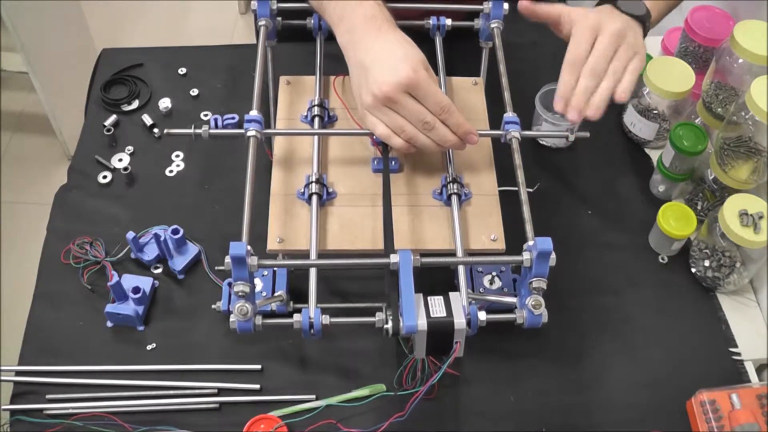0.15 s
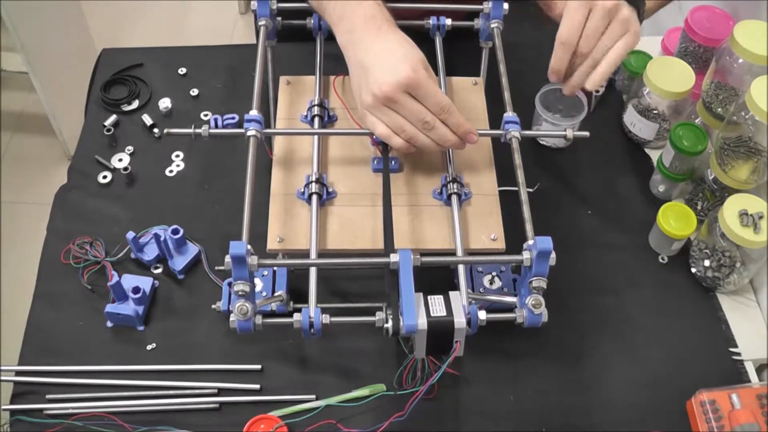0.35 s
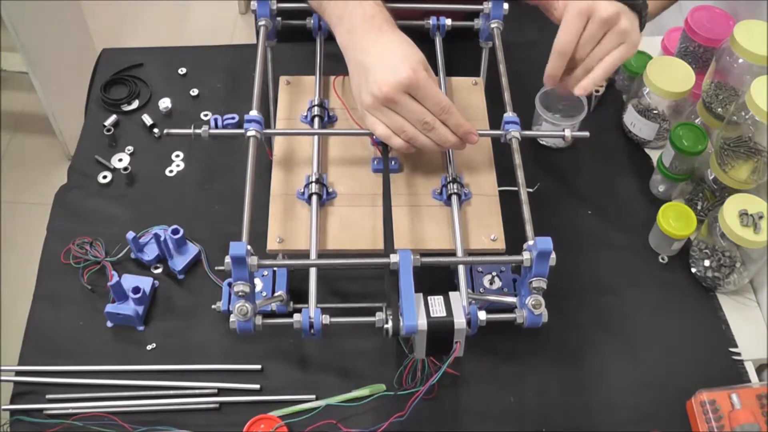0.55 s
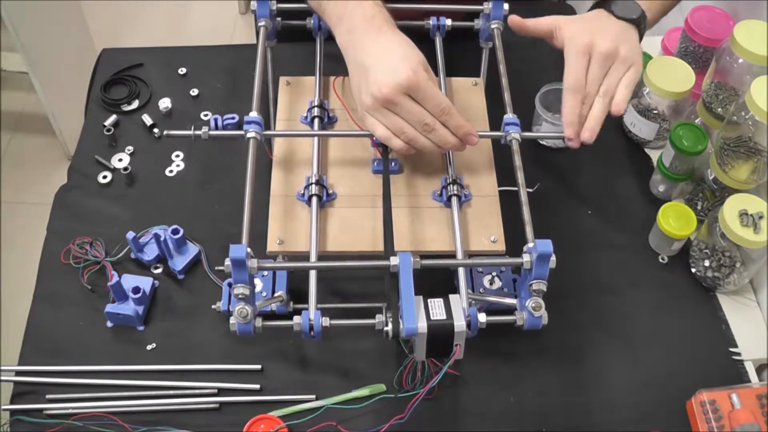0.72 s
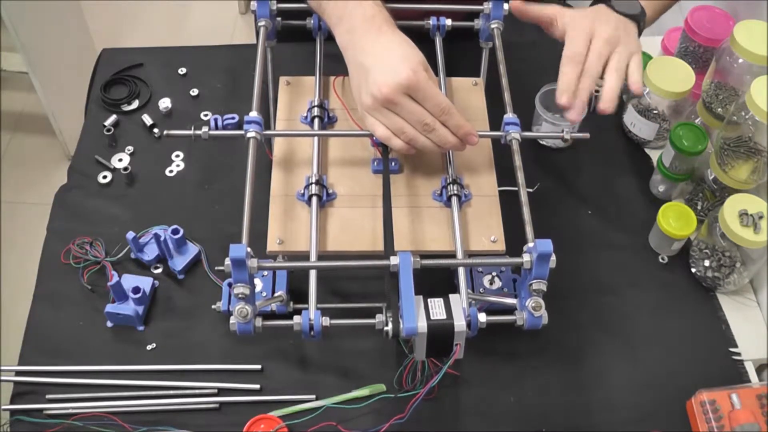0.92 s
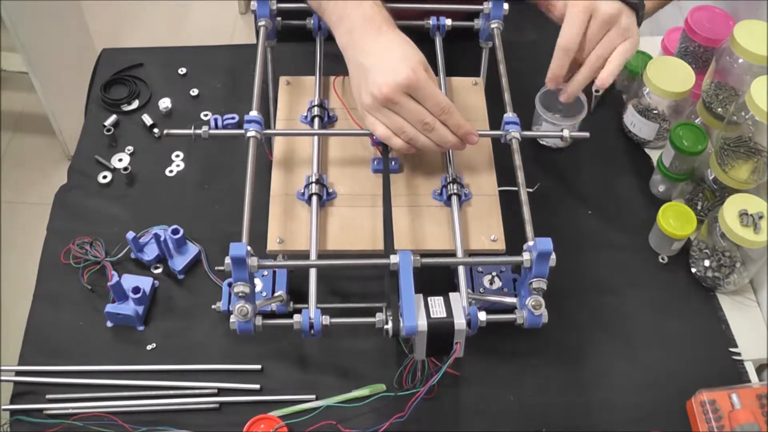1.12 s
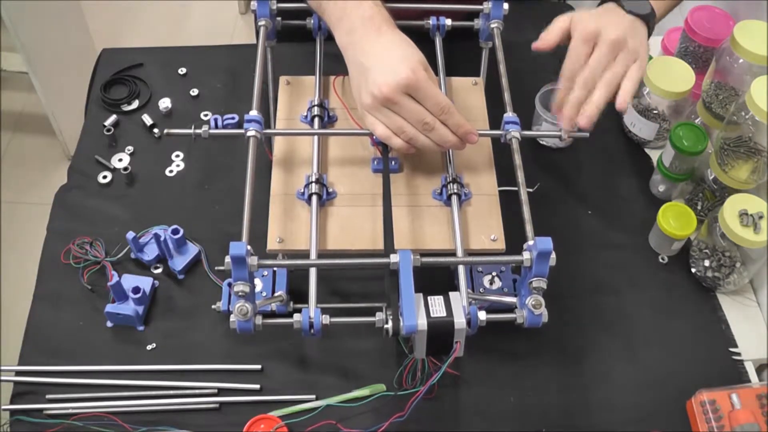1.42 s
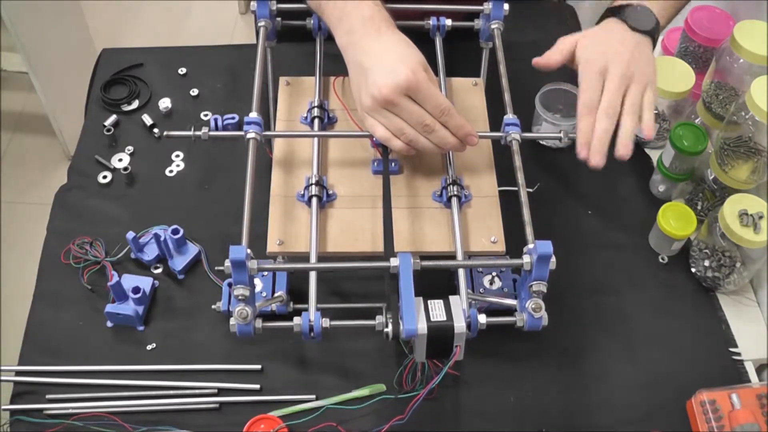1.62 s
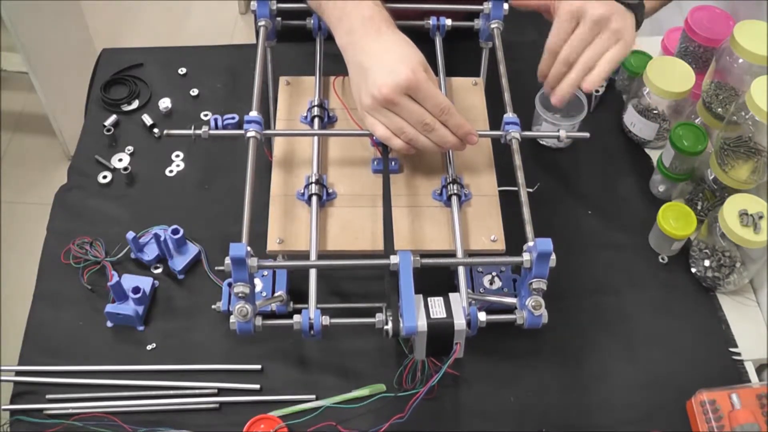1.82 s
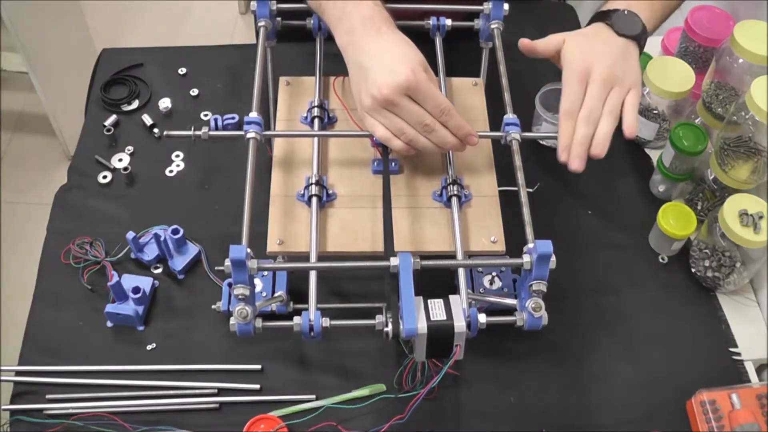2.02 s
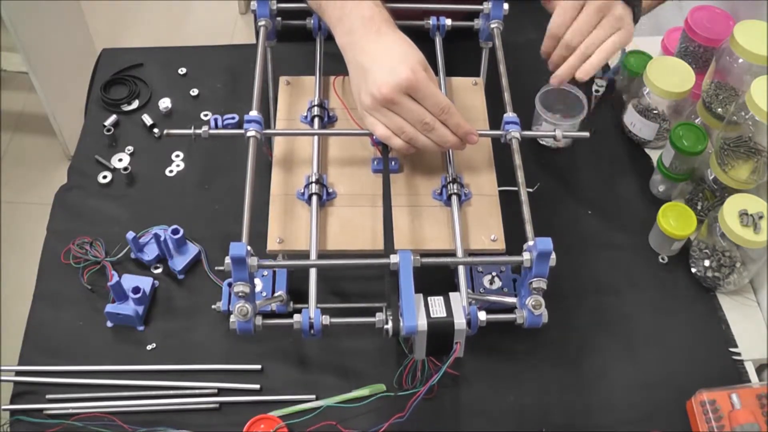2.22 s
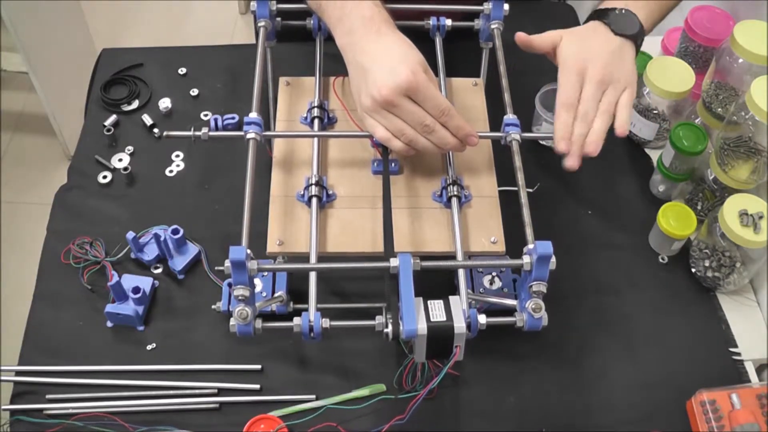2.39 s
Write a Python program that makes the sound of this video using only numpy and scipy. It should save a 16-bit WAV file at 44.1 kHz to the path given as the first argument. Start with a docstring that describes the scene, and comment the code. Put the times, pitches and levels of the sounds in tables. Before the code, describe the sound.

Metal nut spinning on a threaded rod in uneven flicks, clicking, scraping and rattling a light frame

```python
"""A low room rumble lies underneath, and the sound opens just after a flick, in its scrape and ringing.
Fingers give a steel nut on a threaded rod five firm flicks; between them it whirrs along the thread.
Three light flicks follow, each with a short whirr. The rod sits in a frame on a table in a small live room.
Scrapes and whirr are gritty noise that rings the rod; pushes thud and ring the frame; loose parts rattle
as noise bursts. Reflections from table, frame and room surround it all."""
import sys
import numpy as np
from scipy import signal
from scipy.fft import rfft, irfft
from scipy.io import wavfile
from scipy.ndimage import uniform_filter1d

SR = 44100
rng = np.random.default_rng(int(sys.argv[2]) if len(sys.argv) > 2 else 0)


def materialize(psi):
    """Save the field psi as 16-bit PCM at rate SR to the path in sys.argv[1].

    A 1-D psi becomes a single channel; in a 2-D psi each row is a channel.
    """
    bounded = np.clip(np.atleast_2d(psi).T, -1, 1)
    quanta = np.round(bounded * 32767).astype(np.int16)
    wavfile.write(sys.argv[1], SR, quanta)


N = 112454

# steady room rumble, its colour: (frequency [Hz], relative level [dB])
RUMBLE_COLOUR = [(15, -59), (25, -15), (56, 1.5), (123, -2), (249, -10), (309, -8.5), (427, -12.5),
                 (489, -4.5), (531, -16.5), (818, -20.5), (1260, -29), (1400, -31), (2050, -37.5),
                 (3820, -43.5), (5430, -41), (5880, -42.5), (16000, -51)]
# how long the room rings in each band: (frequency [Hz], time to fall by 60 dB [s])
ROOM_DECAY = [(100, 0.45), (260, 0.46), (700, 0.43), (1800, 0.22), (5000, 0.55), (9000, 0.39),
              (14000, 0.24)]
# how far the room sound spreads to the sides: (frequency [Hz], side level [dB])
ROOM_WIDTH = [(60, -19), (200, -13), (600, -10.5), (1200, -6), (2500, -8.5), (3900, -33), (5400, -15.5),
              (6500, -32.5), (7500, -44), (8500, -21), (9700, -15), (11000, -6), (14500, -0.5)]
# the same for the first reflections from table and frame: (frequency [Hz], side level [dB])
NEAR_WIDTH = [(200, -20), (1000, -8), (2500, -29.5), (3700, -35.5), (5400, -16.5), (6500, -25),
              (9000, -20.5), (11000, -5.5), (14500, -7)]
# loose parts rattling after a knock: (start [s], relative level [dB], decay [s])
RATTLES = [(-.03, -31, 0.027), (0.112, -28.5, 0.026), (0.185, -38, 0.045), (.349, -34, 0.057),
           (.620, -29, .018), (0.665, -23.5, 0.018), (0.689, -31, 0.023), (0.862, -39, 0.039),
           (0.916, -25.5, 0.014), (1.129, -26.5, 0.019), (1.195, -37.5, 0.032), (1.595, -38.5, .025)]
# colour of the rattle: (frequency [Hz], relative level [dB])
RATTLE_COLOUR = [(150, 0.5), (400, 9.5), (850, -0.5), (1150, -5), (1380, -8), (1540, -5.5), (1750, -12.5),
                 (2000, -19), (2600, -22), (4500, -16.5), (9000, -26.5)]
# pushes on the frame: (start [s], relative level [dB], centre of the push [Hz], length of the push [cycles])
KNOCKS = [(-.06, -17.5, 324, 0.36), (.097, -18.5, 185, 0.33), (0.182, -20, 245, 1.04),
          (0.349, -23.5, 200, 0.41), (.41, -33, 91, 1.35), (.605, -21, 196, 0.45), (.665, -17.5, 400, 0.97),
          (0.858, -21, 206, 0.33), (.911, -18, 293, 0.79), (1.115, -25, 178, 0.52), (1.137, -42, 72.5, 1.9),
          (1.197, -22.5, 199, 0.35), (1.289, -44.5, 175, 0.48), (1.597, -28.5, 253, 0.49),
          (1.923, -37.5, 342, 0.94), (2.276, -43, 343, 0.96)]
# ringing modes of the frame: (frequency [Hz], relative level [dB], time to fall by 60 dB [s])
FRAME_MODES = [(78, 3, 1), (90, -13, 0.85), (166.4, 5.5, .24), (215.9, -5.5, 0.65), (257.6, -9, 0.52),
               (300.8, -11, 0.082), (397, 0, 0.12), (424.5, 7, 0.073), (426, -3, 0.16), (507, -30.5, 0.12),
               (628, -15, 0.196), (834, -28, .2), (870, -17, 0.21), (1100, -27, 0.22), (1514, -27, .22)]
# bending modes of the rod: (frequency [Hz], width while held [Hz], relative level [dB])
ROD_MODES = [(1594, 84, -5), (2010, 104, 0.5), (3743, 140, -14.5), (4600, 350, -8), (5596, 320, -5),
             (6908, 197, -1), (8254, 147, -3.5), (9682, 203, -1.5), (11150, 195, -5.5), (12500, 250, -10),
             (15100, 210, -7)]
# nut scraping and clicking on the thread: (start [s], relative level [dB], scrape rise [s], scrape decay [s],
# part below the ring [dB], top [dB])
CLICKS = [(-.045, -19, 0.0044, 0.0067, -6.5, -5.5), (0.094, -32, 0.0029, 0.0082, -3.5, 4),
          (0.1, -20.5, 0.0016, 0.0038, 1, 4), (0.107, -30, 0.0018, 0.014, 9, -13),
          (0.158, -30, 0.0023, 0.0059, 2, -11), (0.176, -20.5, 0.0063, 0.0044, 0, 0.5),
          (0.347, -24.5, 0.0043, 0.0044, -4, -2), (0.361, -23.5, 0.0029, 0.0075, 0.5, -6.5),
          (.600, -35, 0.00062, 0.0095, -9, -6), (0.6073, -26, 0.0015, 0.011, 2.5, 3.5),
          (0.625, -25, 0.0024, 0.0026, 2.5, -22), (0.656, -15.5, 0.0031, 0.013, -5.5, -4.5),
          (0.858, -35, 0.0039, 0.018, 5.5, 0.5), (0.893, -37, .004, 0.0051, 3, -24),
          (0.9021, -6.5, 0.012, 0.0014, -17.5, -4.5), (0.911, -26, 0.0017, 0.016, 3.5, -7),
          (1.117, -26, 0.0054, 0.0038, 3.5, 3.5), (1.133, -29.5, 0.0028, 0.0043, 8, -1),
          (1.185, -34, .0015, 0.0051, 2, 10.5), (1.191, -20, .0015, 0.0056, -3, -2),
          (1.5, -39, 0.0026, 0.0071, -2, -7), (1.558, -36.5, 0.0022, 0.012, -9, -9),
          (1.575, -34, 0.0038, 0.0054, 2.5, 3), (1.587, -21.5, 0.0018, 0.0073, -7.5, -8),
          (1.888, -41.5, 0.0041, 0.022, -0.5, -2.5), (1.929, -37, 0.0025, 0.0035, -1, 1),
          (2.235, -45.5, 0.0026, 0.0072, 8, -5), (2.277, -48, 0.0041, .007, 7, -1)]
# colour of steel sliding on steel: (frequency [Hz], relative level [dB])
STEEL_COLOUR = [(300, -5.5), (1500, -12), (2800, -9.5), (4000, -7), (5500, -0.5), (7000, -2.5), (10000, 3),
                (12500, -1.5), (13700, 4), (14700, -17.5), (15200, 0.5), (16000, -44)]
# nut running on the thread: (middle [s], half length [s], relative level [dB])
SPINS = [(0.015, 0.075, -44.5), (0.22, 0.11, -43), (0.463, 0.11, -44), (.78, 0.15, -46.5),
         (1.03, 0.15, -45), (1.541, 0.065, -38), (1.61, 0.019, -37), (1.684, .04, -70), (1.952, 0.082, -43),
         (2.287, 0.063, -36)]
# colour of the running nut: (frequency [Hz], relative level [dB])
WHIRR_COLOUR = [(150, 15), (450, 31), (900, 10.5), (1450, 7), (2020, -1), (2600, -4.5), (4500, -1),
                (7000, 0), (10000, 0), (15000, -8)]

LEAD_S = 0.1  # computed before the audible start, so that earlier sounds are under way
T = np.arange(-int(LEAD_S * SR), N) / SR  # scene time [s]
AGE = np.arange(SR) / SR  # time since a ring or room tail began [s]

RUMBLE_DB = -40.5
ROOM_ONSET_S, NEAR_LAG_S = 0.0021, 0.017
CLICK_ROOM_DB, KNOCK_ROOM_DB, RATTLE_ROOM_DB = -3, -2, -2  # amounts sent into the room
RATTLE_RISE_S = 0.0043
THUD_DB, FRAME_DB = -6.5, -19.5
CLICK_DB, ROD_DB, HELD_DB = -13.5, -17, 4  # bare scrape, free rod, hand-held rod
ROD_T60_S, ROD_SPLIT = 0.22, 0.0091  # ring of the lowest mode; spread of partials as a share of pitch
ROD_DAMPING = 0.94  # higher modes die sooner, by this power of frequency
GRAIN_DB, WHIRR_GRAIN_DB = 3.5, 3.5  # unevenness of the tiny impacts
BODY_HZ, RING_HZ, TOP_EDGE_HZ = 5100, 6960, 11500  # a click's colour is hinged at these
LOW_CUT_HZ, TOP_HZ = 69, 15400


def undb(db):
    """Turn decibels into gain."""
    return 10 ** (np.asarray(db) / 20)


def unit(x):
    """Scale a response to unit energy."""
    return x / np.sqrt(np.sum(x ** 2))


def curve(table, hz):
    """Read between (frequency, value) points, with frequency on a log scale."""
    f, value = np.array(table, float).T
    return np.interp(np.log(np.maximum(hz, 1)), np.log(f), value)


def colour(x, table):
    """Filter a sound by (frequency [Hz], level [dB]) points."""
    gain = undb(curve(table, np.fft.rfftfreq(len(x), 1 / SR)))
    return irfft(rfft(x) * gain, len(x))


def through(x, response):
    """Let a sound set off a response, such as a ring or a room."""
    return signal.fftconvolve(x, response)[:len(x)]


def grit(table, grain_db):
    """Dense tiny impacts of uneven size with a given colour, scaled to rms 1."""
    noise = rng.standard_normal(len(T))
    size = np.minimum(rng.exponential(size=len(T)), 2 * np.pi)  # capped to avoid giant grains
    x = colour(noise * undb(grain_db * size), table)
    return x / x.std()


def burst(start, rise, decay):
    """Quick rise and exponential fall, peak 1."""
    age = np.maximum(T - start, 0)
    env = (1 - np.exp(-(age / rise) ** 2)) * np.exp(-age / decay)
    return env / env.max()


def ring(hz, t60):
    """One tone dying away by 60 dB in t60 seconds, with unit energy."""
    return unit(np.cos(2 * np.pi * hz * AGE) * np.exp(-np.log(1000) * AGE / t60))


def rumble():
    """Steady low room noise, as a middle and a side signal."""
    mid, side = (undb(RUMBLE_DB) * grit(RUMBLE_COLOUR, 0) for _ in range(2))
    return np.array([mid, undb(-0.5) * colour(side, ROOM_WIDTH)])


def reflections():
    """Diffuse room tail: noise, even in colour, that dies away at its own speed in each band."""
    f, t, bands = signal.stft(rng.standard_normal(SR), SR, nperseg=256)
    fade = np.exp(-np.log(1000) * t / curve(ROOM_DECAY, f)[:, None])
    tail = signal.istft(bands * fade, SR)[1][:SR]
    onset = 1 - np.exp(-(AGE / ROOM_ONSET_S) ** 2)
    spectrum = rfft(tail * onset, 2 * SR)
    # divide by the smoothed spectrum to even out the colour
    smooth = np.sqrt(uniform_filter1d(np.abs(spectrum) ** 2, size=70))
    return unit(irfft(spectrum / smooth)[:SR])


def loose_parts():
    """Loose parts chatter briefly around the knocks: short bursts of grit."""
    bursts = sum(undb(db) * burst(s, RATTLE_RISE_S, decay) for s, db, decay in RATTLES)
    return grit(RATTLE_COLOUR, grain_db=5) * bursts


def frame_ring():
    """The frame's modes, ringing together."""
    return unit(sum(undb(db) * ring(hz, t60) for hz, db, t60 in FRAME_MODES))


def frame():
    """Each push of the fingers is a short swelling wave that thuds and sets the frame ringing."""
    push = 0
    for s, db, hz, cycles in KNOCKS:
        turns = np.maximum(T - s, 0) * hz  # cycles since the push began
        swell = turns / cycles * np.exp(1 - turns / cycles)
        push = push + 2 * undb(db) * np.sin(2 * np.pi * turns) * swell
    return undb(THUD_DB) * push + undb(FRAME_DB) * through(push, frame_ring())


def held_ring():
    """The rod's modes, broadened by the grip of the hand: a wider mode dies sooner."""
    out = 0
    for hz, width, db in ROD_MODES:
        fade = np.exp(-np.pi * width * AGE)
        level = undb(db) * 2 * np.pi * width / SR
        out = out + level * np.cos(2 * np.pi * hz * AGE) * fade
    return out


def rod_ring(t60, split, count=9):
    """The rod's free ring: each mode is split into close partials by thread and clamps."""
    out = 0
    for hz, width, db in ROD_MODES:
        spread = np.linspace(-2, 2, count) + rng.uniform(-1, 1, count) / count
        signs = np.sign(rng.standard_normal(count))
        life = t60 * (ROD_MODES[0][0] / hz) ** ROD_DAMPING
        # partials further from the middle are weaker
        partials = sum(sign * np.exp(-d * d / 2) * ring(hz * (1 + split * d), life)
                       for sign, d in zip(signs, spread))
        out = out + undb(db) * unit(partials)
    return unit(out)


def nut():
    """Short scrapes and the whirr of the running nut, both gritty noise that rings the rod."""
    scrapes = 0
    for s, db, rise, decay, body_db, top_db in CLICKS:
        tint = [(BODY_HZ, body_db), (RING_HZ, 0), (TOP_EDGE_HZ, top_db)]
        steel = colour(grit(STEEL_COLOUR, GRAIN_DB), tint)
        scrapes = scrapes + undb(db) * burst(s, rise, decay) * steel
    swells = sum(undb(db) * np.exp(-((T - s) / half) ** 2) for s, half, db in SPINS)
    sliding = scrapes + grit(WHIRR_COLOUR, WHIRR_GRAIN_DB) * swells
    rod = undb(ROD_DB) * rod_ring(ROD_T60_S, ROD_SPLIT) + undb(HELD_DB) * held_ring()
    return undb(CLICK_DB) * sliding + through(sliding, rod)


def scene():
    """Nut, frame and rattle straight ahead, with the table and the room around them."""
    air_mid, air_side = rumble()
    rattle, knocks, steel = loose_parts(), frame(), nut()
    direct = steel + knocks + rattle
    send = undb(CLICK_ROOM_DB) * steel + undb(KNOCK_ROOM_DB) * knocks + undb(RATTLE_ROOM_DB) * rattle
    near = np.pad(direct, (int(NEAR_LAG_S * SR), 0))[:len(T)]  # late copy off table and frame
    # middle and side get separate room tails
    mid = direct + through(send, reflections()) + air_mid
    room_side = colour(through(send, reflections()), ROOM_WIDTH)
    side = colour(near, NEAR_WIDTH) + room_side + air_side
    left, right = undb(-0.37) * (mid + side), mid - side
    return np.array([left, right])[:, -N:]


def record(dry):
    """The recorder cuts the deep bass gently and the top steeply."""
    low_cut = signal.butter(3, LOW_CUT_HZ, "highpass", fs=SR, output="sos")
    top_cut = signal.ellip(8, 0.2, 80, TOP_HZ, fs=SR, output="sos")
    return signal.sosfilt(top_cut, signal.sosfilt(low_cut, dry))


dry = scene()
out = record(dry)
materialize(out)
```